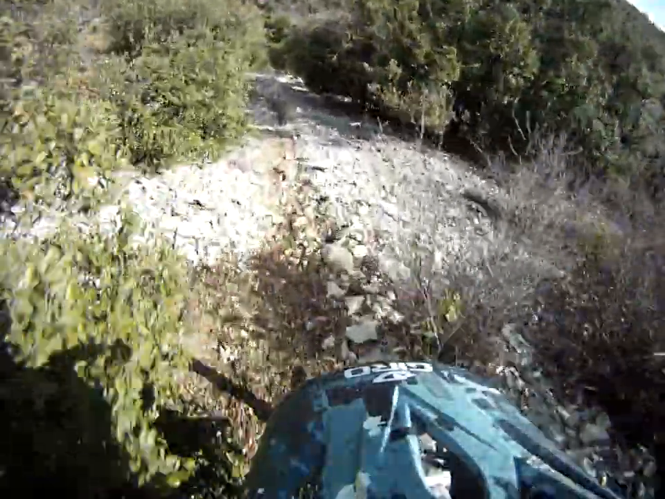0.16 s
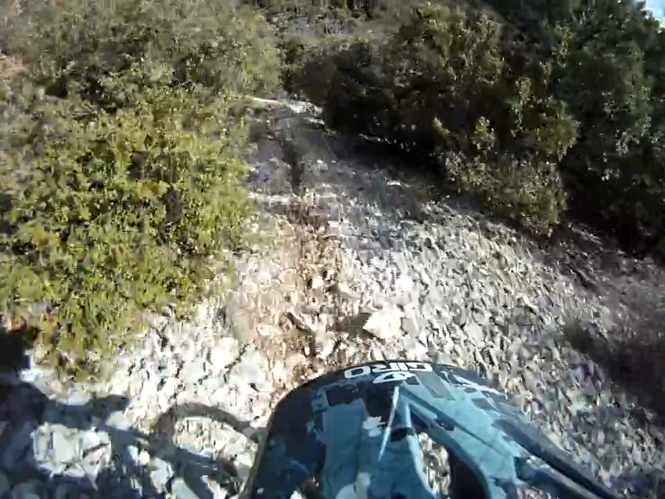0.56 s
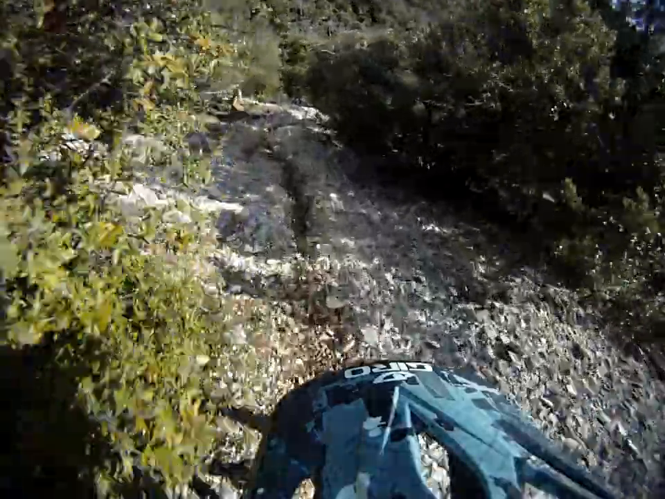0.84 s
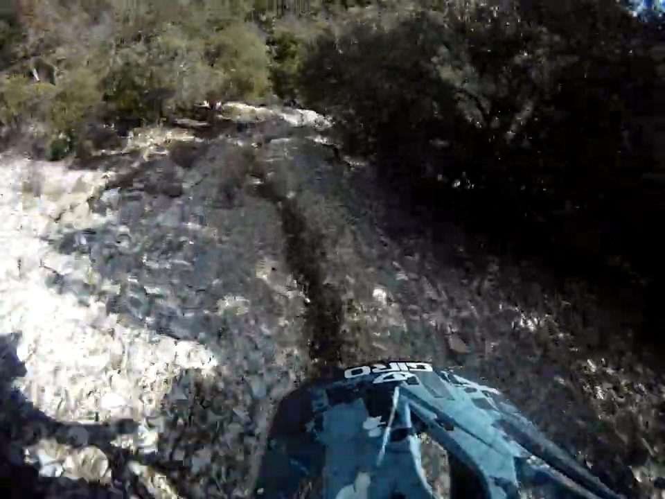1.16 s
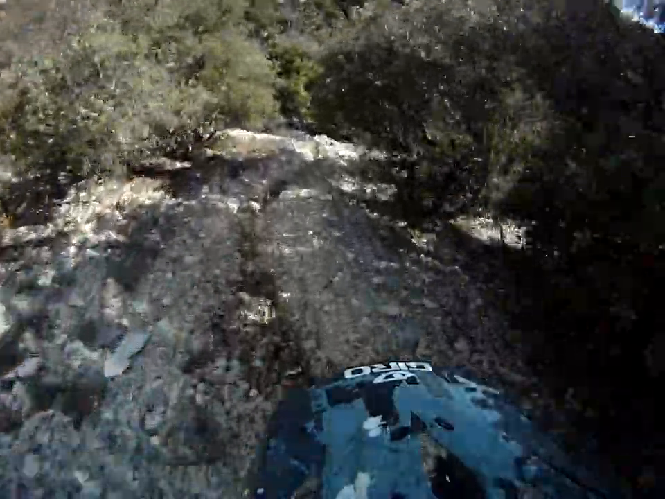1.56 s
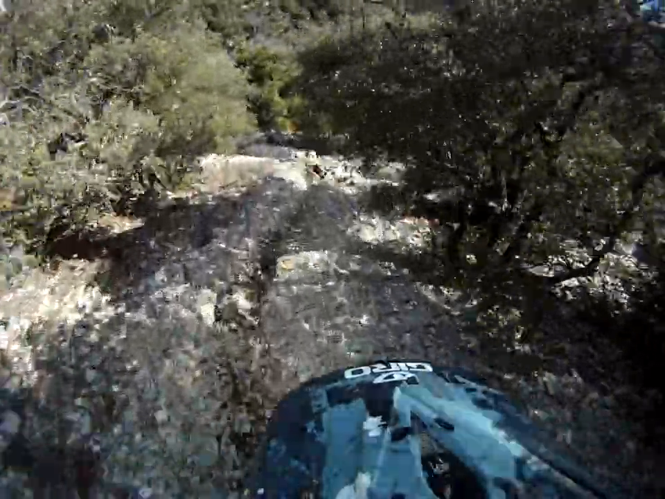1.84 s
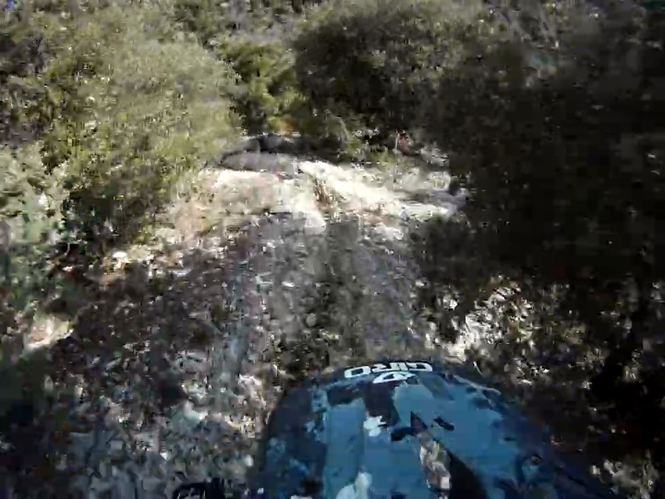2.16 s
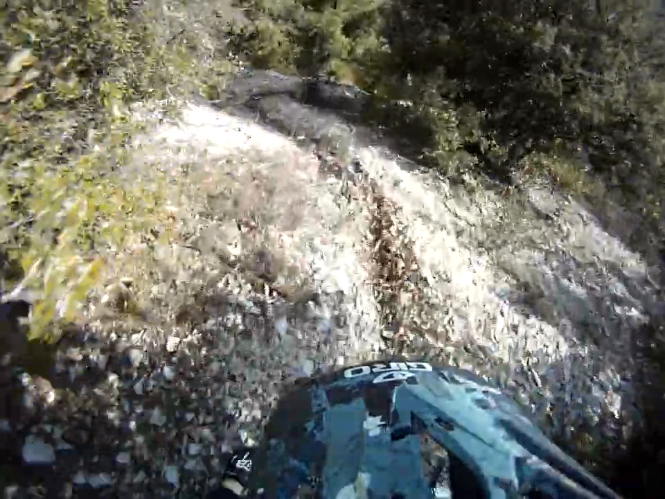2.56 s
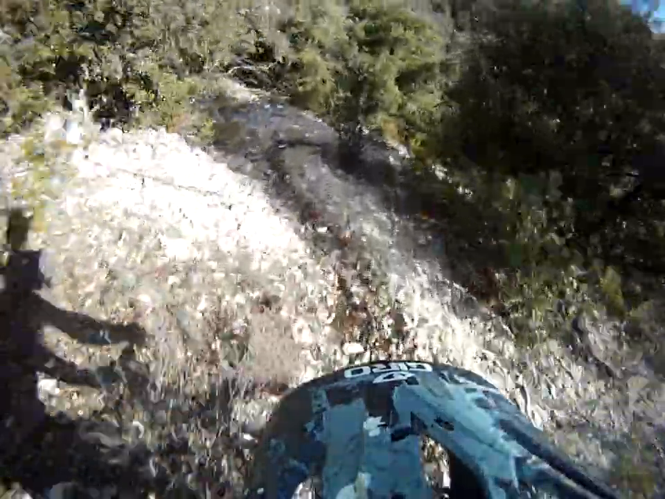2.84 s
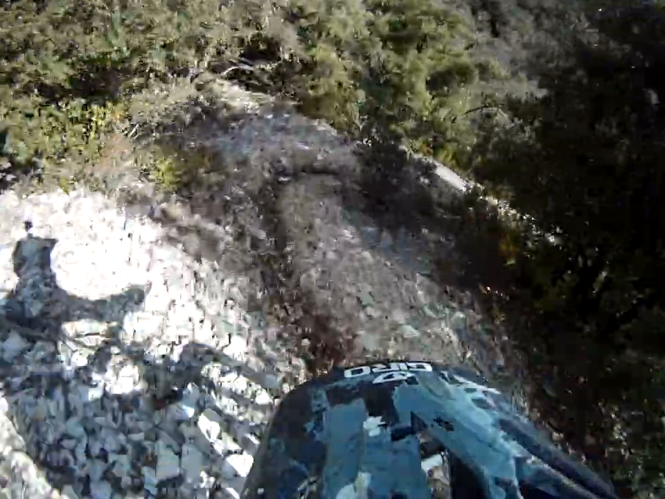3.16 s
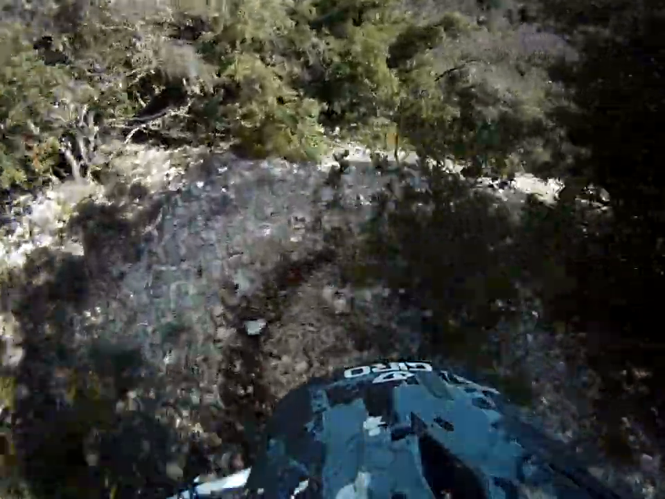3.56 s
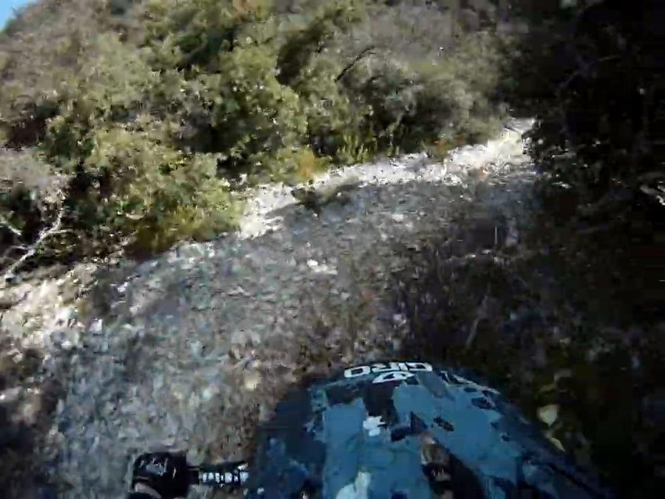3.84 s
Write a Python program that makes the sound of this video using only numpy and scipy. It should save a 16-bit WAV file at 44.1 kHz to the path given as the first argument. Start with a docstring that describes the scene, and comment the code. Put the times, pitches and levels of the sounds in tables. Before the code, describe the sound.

A bike rolls down a stony trail, tyres grinding and stones snapping, one hollow plastic knock early on, finally much louder twig blows and scraping; dull, gritty mono sound from an enclosed helmet microphone.

```python
"""A helmet camera in a closed case rides a bicycle over loose stones: the tyres crunch, single stones click,
wind and jolts rumble through the case. One hard knock rings the case; at the end twigs whip and scrape it.
The mono camera holds each 12 kHz sample, which mirrors the sound into the treble."""
import sys
import numpy as np
from scipy import signal
from scipy.fft import rfft, irfft, next_fast_len
from scipy.io import wavfile
from scipy.ndimage import map_coordinates

SR = 44100
rng = np.random.default_rng(int(sys.argv[2]) if len(sys.argv) > 2 else 0)


def file_out(sig):
    """Save sig as 16-bit WAV at sys.argv[1]."""
    # one column per channel
    cols = np.atleast_2d(sig).T
    # limit, then scale
    lim = np.clip(cols, -1, 1)
    pcm = np.round(lim * 32767).astype(np.int16)
    wavfile.write(sys.argv[1], SR, pcm)


N = 176400

# (s, crunch dB, level of its treble dB)
CRUNCH = [(0, -39.5, -37), (.1, -39.5, -37.5), (.2, -45, -43), (.32, -50, -50.5), (.55, -47, -62), (.74, -46, -58),
          (.8, -44.5, -41), (.87, -42, -48), (1.02, -43, -50), (1.2, -45, -57.5), (1.45, -43, -55.5), (1.7, -43, -49.5),
          (1.82, -39.5, -40.5), (1.93, -41.5, -42), (2.02, -44, -44), (2.2, -40, -40.5), (2.3, -41, -38.5), (2.45, -43, -42),
          (2.53, -45.5, -45), (2.65, -48.5, -41), (2.75, -45, -42.5), (2.86, -43, -39.5), (2.93, -38, -36), (3.02, -45, -46.5),
          (3.27, -44.5, -44.5), (3.4, -45, -41.5), (3.53, -43, -38), (3.68, -46.5, -43)]
WIND = [(0, -41.5), (.4, -42), (.67, -38.5), (1.1, -37), (1.4, -43), (1.67, -37), (2.1, -39.5),
        (2.31, -31.5), (2.4, -41.5), (2.54, -48.5), (2.63, -34), (2.72, -44), (2.85, -39.5), (2.92, -29), (3.0, -38),
        (3.4, -38.5), (3.48, -34), (3.68, -24), (3.74, -27.5), (3.82, -20), (3.87, -29), (3.92, -22.5), (4, -34)]  # (s, rumble dB)
# (s, peak dB, pitch Hz, bright part dB over it)
STONES = [(0.007, -26.5, 2400, -15), (0.083, -29, 3520, -17), (0.0948, -26.5, 1830, -5), (0.4656, -34.5, 1740, -1), (0.7732, -29.5, 1630, 0.5),
          (1, -30, 1710, -24), (1.5294, -35, 2820, -2.5), (1.6302, -27.5, 1620, -3),
          (1.7555, -32.5, 1640, 0.5), (1.7978, -22.5, 2300, -2.5), (1.9036, -23, 1770, -29), 
          (1.976, -31.5, 1670, -2), (2.0646, -22, 1960, -6.5), (2.1193, -28, 3240, -21), (2.284, -24, 2270, -2.5),
          (2.3132, -22, 1680, -3.5), (2.6498, -25.5, 2870, -4), (2.83, -26.5, 1670, -9),
          (2.94, -32, 1770, -3), (3.519, -23, 2190, -8), (3.981, -17, 5130, -25)]
# (s, peak dB, centre of its colour Hz, middle modes dB over the outer ones, crack dB over it, time to peak s)
TWIGS = [(3.693, -1.5, 1900, -4, -18.5, 0.0042), (3.701, -13, 2200, 2, -27, 0.0016), (3.7197, -15, 2200, 2, -27, 0.0033), (3.7247, -3, 2000, 5, -26, .0045),
         (3.788, -24.5, 2300, -4, -14, .0069), (3.814, -19.5, 1550, -1, -14, 0.0047), (3.882, -7.5, 2100, -12, -16, 0.0028),
         (3.900, -7.5, 2110, -14, -20, .0025), (3.907, -10, 1900, -16, -32, 0.0037), (3.926, -21, 2600, -10, -24, .002), (3.933, -13.5, 1700, -8, -16, 0.0035),
         (3.945, -14.5, 2000, 0, -21, .002), (3.9485, 0, 1890, -9, -16, .003), (3.960, -17, 1600, -6, -22, 0.0031), (3.973, -8.5, 1600, -6, -25, 0.0031),
         (3.9794, -4.5, 1800, -5, -13.5, .003), (3.987, -15, 2200, 8, -29, 0.0042), (3.9943, 0, 2330, 4.5, -22, .002)]
SCRAPE = [(3.68, -57, -56), (3.71, -31, -28), (3.76, -36, -45), (3.79, -35, -43), (3.84, -33, -37), (3.87, -37.5, -48), (3.9, -27, -34), (3.94, -31.5, -35.5), (4, -19.5, -56)]  # (s, rasp dB, low shake dB)
CASE = [(790, -2), (1500, 1.5), (1880, -2), (2200, 0.5), (2620, 0.5), (3600, -11)]  # modes under the twigs (Hz, dB)
KNOCK = [(134.2, -29, 0.39), (738, -8.5, 0.076), (784, -6, 0.068), (861, -10, 0.07), (1240, -10, 0.025), (1390, -4, 0.015), (1830, 4.5, 0.0082), (2604, -9, 0.018), (3550, -5, 0.015), (4900, -6, 0.015)]  # (Hz, dB, t60 s)
BODY = [(500, -27), (850, -18.5), (1200, -10), (1500, -4), (1750, 0), (2050, -6), (2650, -9), (3000, -16.5), (3800, -19.5), (5500, -28.5)]  # (Hz, dB per Hz)
BRIGHT = [(1800, -31), (2550, -3.5), (3300, -5), (4800, -13.5), (5500, -7), (6500, -12.5)]
RUMBLE = [(6, -25.5), (12, 0.5), (27, 1.5), (45, -5.5), (65, -2), (80, -14), (95, -20), (130, -19), (170, -36), (260, -48.5)]
FLUTTER = [(90, -13), (150, -2.5), (560, -8.5), (1000, -14), (1500, -25)]
RASP = [(550, -67), (780, -10), (1050, -10), (1550, 2.5), (2100, 1.5), (2600, 2), (3100, -9.5), (6000, -19.5)]
HOLD_HZ, TOP_HZ, ROLL_HZ = 12000, 16414, 15350  # fixed
ROLL_DB = -21.5
FLUTTER_DB = [(0, -56), (.2, -61), (.9, -58), (1.89, -55), (1.915, -41.5), (1.94, -51), (2.6, -57), (2.9, -54), (3.1, -57.5), (4, -54)]  # (s, flutter dB)
KNOCK_S = .9462  # fixed
KNOCK_DB, TICK_LEAD_S, TICK_DB = -8, .0068, -21
GUARD_HZ = 5813
OFF_CENTRE_DB = -18  # loss of a mode one octave from the centre of the blow
MIDDLE_HZ = 1700, 2400  # modes in this range are the middle ones  # fixed
THUMP_DB, THUMP_HZ = -24.5, 149.4  # low thud of each blow, under its peak
HUM_S = None
HUM_HZ, HUM_DB, HUM_PEAK_S = 965, -48, 0.067  # a faint tone at the start


def amp(db):
    return 10 ** (np.asarray(db) / 20)


def unit(x):
    return x / np.sqrt(np.mean(x ** 2) + 1e-20)


def curves(rows):
    """One value per sample for each column after the time."""
    s, *cols = np.transpose(rows)
    return [np.interp(np.arange(N) / SR, s, c) for c in cols]


def wobble(rate):
    """A smooth random curve, rate knots a second."""
    return map_coordinates(rng.standard_normal(int(N * rate / SR) + 4), [np.arange(N) * rate / SR])


def coloured(x, spectrum):
    """x through (Hz, dB) points on a log axis, at rms 1."""
    m = next_fast_len(N + 8192)  # fixed
    f, v = np.transpose(spectrum)
    gain = amp(np.interp(np.log(np.fft.rfftfreq(m, 1 / SR) + 1), np.log(f + 1), v))
    return unit(irfft(rfft(x, m) * gain, m)[:N])


def grit(per_s, spread_db, life_s, share):
    """Noise with random contacts in it: short bursts of uneven size."""
    hits = (rng.random(N) < per_s / SR) * amp(spread_db * rng.exponential(size=N))
    bursts = signal.lfilter([1], [1, -np.exp(-1 / (life_s * SR))], hits)
    return rng.standard_normal(N) * (1 + share * unit(bursts))


def add(out, s, x):
    """Lays x into out at time s."""
    part = out[round(s * SR):][:len(x)]
    part += x[:len(part)]


def ring(modes, t, rise_s, scatter_db, loose=1):
    """Modes (Hz, dB, t60) struck once, neighbours in opposite sense, each at a new level and phase."""
    dice = rng.standard_normal((len(modes), 2))
    return (1 - np.exp(-t / rise_s)) * sum(amp(db + scatter_db * a - 60 * t / t60) * np.sin(2 * np.pi * hz * t + np.pi * k + loose * b)
                                           for k, ((hz, db, t60), (a, b)) in enumerate(zip(modes, dice)))


def tyres():
    """Dense stone contacts: a dull crunch and a denser bright one that share their surges, with pebbles ticking
    in them."""
    body_db, bright_db = curves(CRUNCH)
    surge_db = 0.89 * wobble(8.75) + 0.62 * wobble(25.43)
    fade = np.arange(N) < 3.7 * SR  # fixed
    body = amp(body_db + surge_db) * coloured(grit(per_s=210, spread_db=1.5, life_s=0.0044, share=0.36), BODY)
    bright = amp(bright_db + 1.3 * surge_db + 1.37 * wobble(60)) * coloured(grit(per_s=360, spread_db=2.5, life_s=0.003, share=0.6), BRIGHT)
    ticks = amp(body_db - 8) * pebbles(per_s=200, centre_hz=1993, spread=0.26, size_db=2.5, life_s=0.0011)
    return (body + bright + ticks) * fade


def stones():
    """Single stones snap: a short cluster of tones near their pitch, a bright spit and a tail of grit."""
    out, spit, tail, t = np.zeros(N), np.zeros(N), np.zeros(N), np.arange(SR // 10) / SR
    for s, db, hz, bright_db in STONES:
        tone = ring([(hz, -6, .05), (hz * 1.3, -11, .04), (hz * 0.755, -11, .04)], t, rise_s=.001, scatter_db=-4.5)
        add(out, s - .001, amp(db) * tone * swell(t, peak_s=0.0041))
        add(spit, s - .001, amp(db + bright_db - 5.0) * (swell(t, peak_s=0.0025) + 0.27 * swell(t, peak_s=0.009)))
        add(tail, s - .003, amp(db - 18.5) * swell(t, peak_s=0.0096))
    return out + spit * coloured(rng.standard_normal(N), BRIGHT) + tail * coloured(rng.standard_normal(N), BODY)


def wind():
    """Lumpy rumble, a faint flutter and a brief hum in the case."""
    t = np.arange(N) / SR
    hum = amp(HUM_DB + 3 * wobble(33)) * swell(t, HUM_PEAK_S) * np.sin(2 * np.pi * HUM_HZ * t)
    rumble = unit(amp(1.87 * wobble(14)) * coloured(rng.standard_normal(N), RUMBLE))
    flutter = amp(1.4 * wobble(5.82)) * coloured(rng.standard_normal(N), FLUTTER)
    return amp(curves(WIND)[0]) * rumble + amp(curves(FLUTTER_DB)[0]) * flutter + hum


def knock():
    """A lead-in tick, then a hard blow that rings the case."""
    out, t = np.zeros(N), np.arange(SR // 2) / SR
    crack = rng.standard_normal(len(t)) * amp(-1.5 - 60 * t / 0.024)
    add(out, KNOCK_S, amp(KNOCK_DB) * (ring(KNOCK, t, rise_s=0.00038, scatter_db=0.5, loose=0.19) + crack))
    add(out, KNOCK_S - TICK_LEAD_S, amp(TICK_DB) * np.sin(2 * np.pi * 3300 * t) * swell(t, peak_s=0.00046))
    return out


def twigs():
    """Twigs whip the case, each blow swelling in its modes with a crunch and a thump, over a rasp and a low shake."""
    out, crack, crunch, thump = np.zeros((4, N))  # fixed
    t = np.arange(SR // 10) / SR
    for s, db, centre_hz, middle_db, crack_db, peak_s in TWIGS:
        modes = [(hz * (1 + 0.02 * rng.standard_normal()), level + (MIDDLE_HZ[0] < hz < MIDDLE_HZ[1]) * middle_db + OFF_CENTRE_DB * np.log2(hz / centre_hz) ** 2, .1) for hz, level in CASE]
        add(out, s, amp(db - 5.5) * ring(modes, t, rise_s=0.00052, scatter_db=2.0) * swell(t, peak_s, sharp=2.66))
        add(crack, s, amp(db + crack_db) * swell(t, 0.41 * peak_s))
        add(crunch, s, amp(db - 17) * swell(t, 1.11 * peak_s))
        add(thump, s, amp(db + THUMP_DB) * swell(t, peak_s=0.0056) * np.sin(2 * np.pi * THUMP_HZ * t))
    rasp_db, shake_db = curves([(SCRAPE[0][0] - .01, -120, -120)] + list(SCRAPE))
    rasp = coloured(grit(per_s=126, spread_db=-5, life_s=0.0029, share=0.56), RASP)
    shake = coloured(rng.standard_normal(N), [(70, -52), (120, 9.5), (180, -4), (260, -19.5), (370, -3.5), (500, -27), (900, -23)])
    return (out + crack * coloured(rng.standard_normal(N), [(2000, -11.5), (3300, 2.5), (6000, -15.0)]) + crunch * coloured(rng.standard_normal(N), RASP)
            + amp(rasp_db) * rasp + amp(shake_db) * shake + thump)


def swell(t, peak_s, sharp=1.63):
    """Rises to 1 at peak_s and dies away."""
    u = t / max(peak_s, 3e-4)
    return (u * np.exp(1 - u)) ** sharp


def pebbles(per_s, centre_hz, spread, size_db, life_s):
    """Small stones tick at random, each a short damped tone; rms 1."""
    u = rng.random((int(per_s * N / SR), 3))
    hz = centre_hz * np.exp(spread * rng.standard_normal(len(u)))[:, None]
    k = np.arange(600)  # fixed
    tick = amp(-size_db * np.log(u[:, 1:2])) * swell(k / SR, life_s) * np.sin(2 * np.pi * hz * k / SR)
    return unit(np.bincount(((u[:, :1] * N).astype(int) + k).ravel(), tick.ravel())[:N])


def scene():
    return np.tile(tyres() + stones() + wind() + knock() + twigs(), (2, 1))


def record(dry):
    """Guards against folding, samples at a low rate, clips, holds each sample four steps, then cuts the top."""
    long = np.pad(dry, ((0, 0), (0, SR)))  # fixed
    hz = np.fft.rfftfreq(long.shape[1], 1 / SR)
    long = irfft(rfft(long) / (1 + (hz / GUARD_HZ) ** 40), long.shape[1])
    slow = np.clip(signal.resample(long, long.shape[1] * HOLD_HZ // SR, axis=1), -.92, .92)  # fixed
    held = signal.resample(np.repeat(slow, 4, axis=1), long.shape[1], axis=1)  # fixed
    return irfft(rfft(held) * np.where(hz < ROLL_HZ, 1, amp(ROLL_DB)) * (hz < TOP_HZ), long.shape[1])[:, :N]


dry = scene()
out = record(dry)
file_out(out)
```